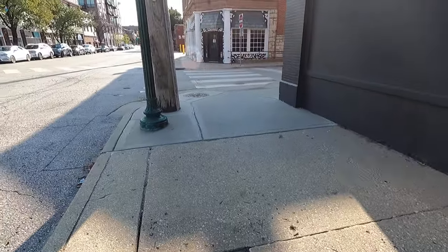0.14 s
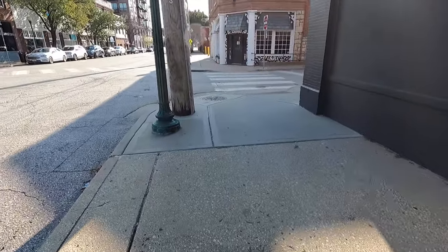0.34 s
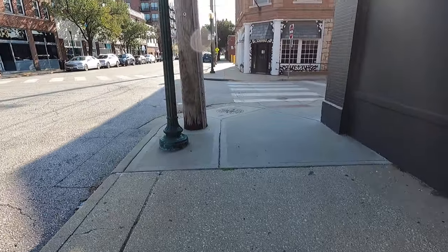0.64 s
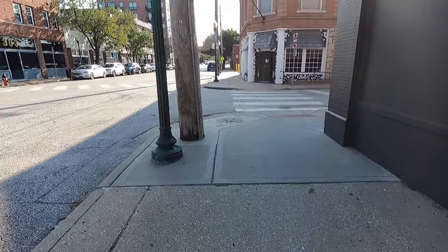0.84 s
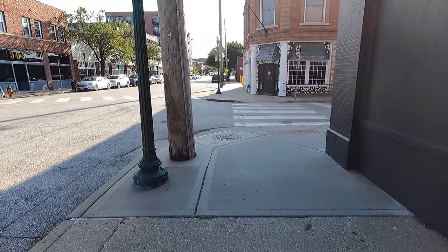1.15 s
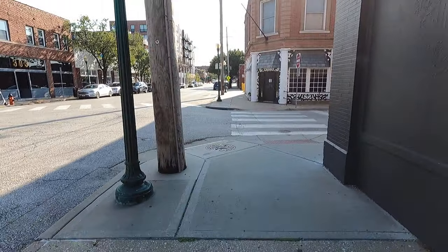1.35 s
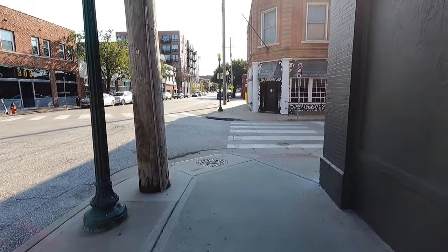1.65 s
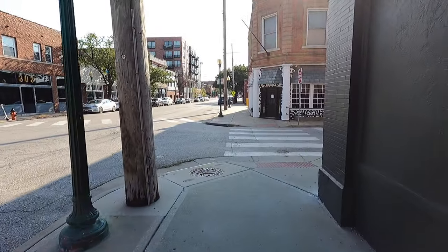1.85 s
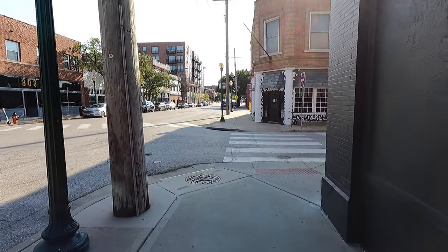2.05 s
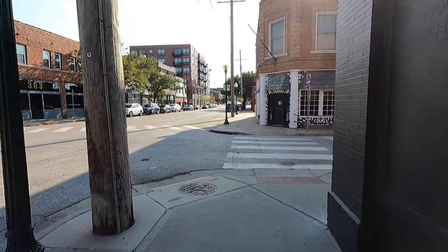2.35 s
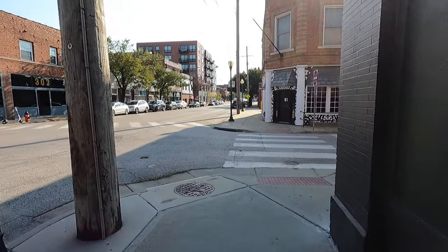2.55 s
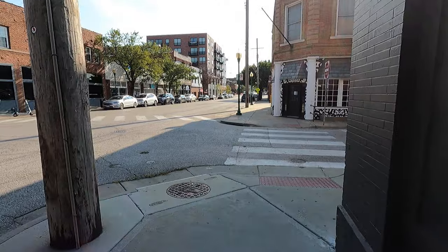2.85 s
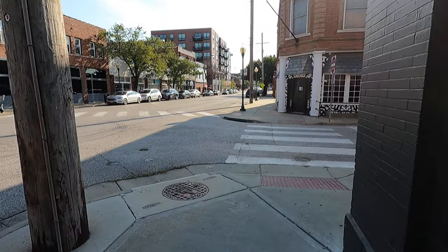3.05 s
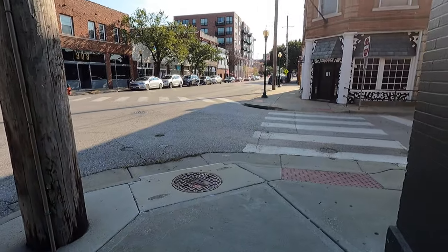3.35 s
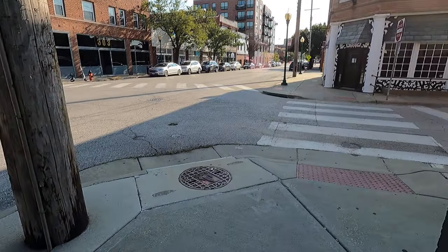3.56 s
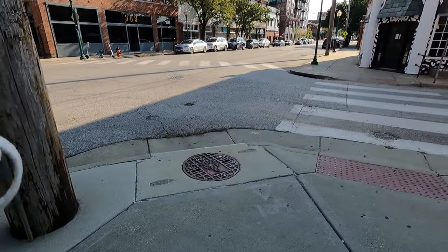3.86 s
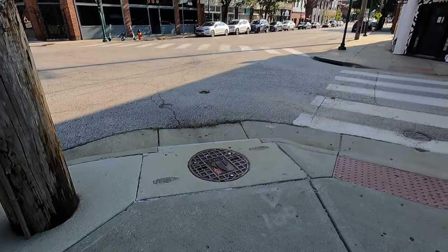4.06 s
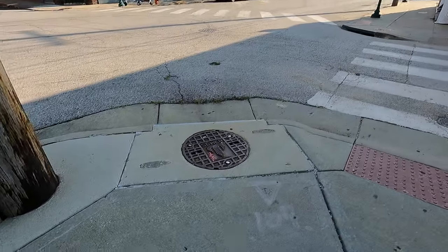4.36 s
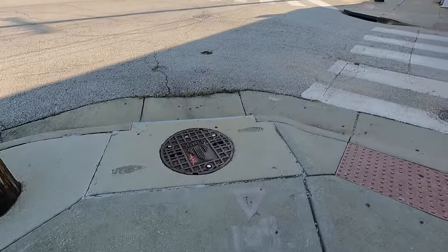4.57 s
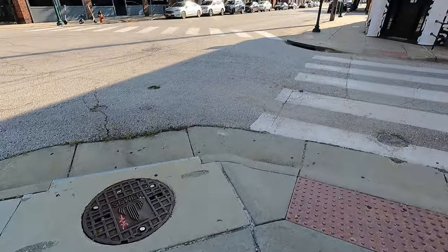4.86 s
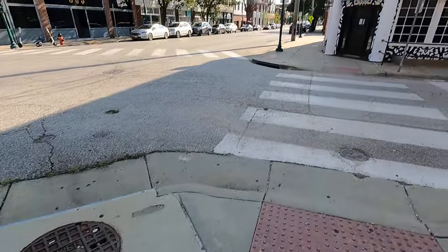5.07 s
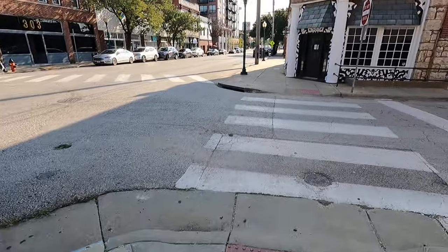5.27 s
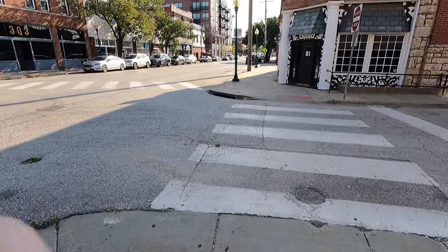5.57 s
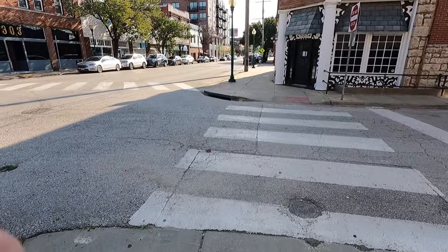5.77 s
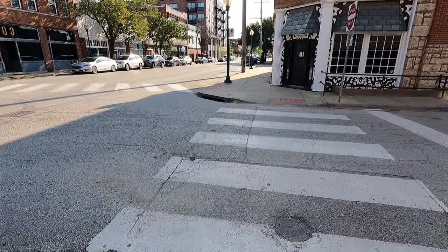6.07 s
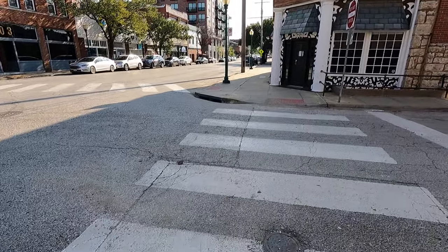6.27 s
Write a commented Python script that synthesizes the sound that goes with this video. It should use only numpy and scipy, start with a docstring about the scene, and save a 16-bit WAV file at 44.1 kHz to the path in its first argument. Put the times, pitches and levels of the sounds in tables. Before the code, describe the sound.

Outdoors on a town pavement, close footsteps tap, crunch and scrape over grit while a large engine rumbles in the street. Its low exhaust swells and ebbs as the pitch sinks, with one short rise in speed. Two brief knocks sound nearby, the first louder. A car's tyres sing and fade away into steady traffic noise, and distant cicadas hiss faintly near the start and end.

```python
"""Small-town pavement, a walk up to a crossing. A big engine with a booming exhaust slows, picks up
briefly and rolls on; its crank orders swell as they slide through the pipe's resonances.
Soles tap and scuff on gritty concrete, echoed by house fronts; two sharp knocks sound close by.
Behind: traffic, the singing tyres of a receding car, cicadas hissing in the trees, a faint whine."""
import sys
import numpy as np
from scipy import signal
from scipy.io import wavfile

SR = 44100
rng = np.random.default_rng(int(sys.argv[2]) if len(sys.argv) > 2 else 0)


def wav_out(sig):
    """Save sig, one row per channel (or a flat mono array), as 16-bit PCM at SR to the path in sys.argv[1]."""
    wavfile.write(sys.argv[1], SR, np.round(np.clip(np.atleast_2d(sig).T, -1, 1) * 32767).astype(np.int16))


N = 282681
TIME_S = np.arange(N) / SR

# crankshaft speed: t/s, f/Hz
CRANK_HZ = [(0.0, 38.5), (0.4, 36.5), (1.0, 35.4), (2.0, 32.7), (2.9, 30.0), (3.45, 28.0), (3.75, 29.9),
            (4.0, 32.4), (4.25, 32.0), (4.5, 29.8), (4.75, 26.3), (5.0, 25.0), (5.25, 24.3), (5.5, 22.5),
            (5.75, 23.4), (6.0, 25.4), (6.2, 25.2), (6.4, 24.3)]
# order drive, ahead of the pipe: t/s, throbbing 2nd/dB, booming 3rd/dB, others/dB
DRIVE_DB = [(0, -18, -4, -8), (.2, 0.5, 2, 5.5), (.5, -18, 2, -6), (.85, -4, -1, -3),
            (1.35, -2, 2.5, -10.5), (1.8, -13.5, -3.5, -3), (2.1, -5, -3, -8.5), (2.5, -6.5, -10.5, 1),
            (2.72, -4, -18, 3.5), (3.05, -8, 4, -7), (3.35, 0, 0.5, -5), (3.75, -8, -0.5, 0),
            (4.05, -4, -8, -3.5), (4.35, -8.5, 4.5, -1), (4.85, -13, -2, -3.5), (5.2, -2.5, -9, -2),
            (5.6, -5, -22, -1.5), (6.05, -4.5, -12, -2.5), (6.41, 0.5, 7.5, -5.5)]
# firing pattern, orders 1-5: gain/dB
FIRING_DB = [-6.5, 2.5, 5.7, 3, 1]
# low pipe resonances: f/Hz, half width/Hz, gain/dB
PIPE_BOOMS = [(31, 6.2, -26.5), (53.3, 7.1, -23.5), (105.4, 9.4, -23.5)]
# upper pipe response: f/Hz, gain/dB
PIPE_UPPER_DB = [(135, -43), (150, -43), (161, -33.5), (174, -40), (190, -40.5), (208, -49.5), (240, -49.5),
                 (268, -49.5), (320, -62.5), (450, -59)]

# soles landing: t/s, tap level/dB, f/Hz, t60/s, crunch level/dB
SOLE_TAPS = [(1.054, -28.5, 1260, .025, -44), (1.085, -21, 1260, 0.0065, -58),
             (1.0978, -23, 1290, 0.0062, -51), (2.653, -31.5, 1320, .03, -37),
             (2.667, -34, 900, 0.023, -49), (2.717, -35, 1210, 0.025, -42),
             (3.331, -29, 1140, 0.038, -46.5), (3.409, -31, 540, 0.014, -63), (3.921, -37, 620, .017, -49),
             (4.515, -41, 1540, 0.022, -50), (4.604, -35.5, 634, 0.022, -55),
             (5.683, -32.5, 1410, 0.057, -40), (5.852, -27, 1400, .014, -60)]
# grit cracking: t/s, level/dB, f/Hz, width/oct
GRIT_CRACKS = [(0.391, -34, 2820, 1.5), (.44, -32, 3500, 1.2), (1.032, -45, 7800, .5),
               (1.05, -33, 4500, 1.6), (1.086, -31, 6500, 0.99), (1.097, -36, 4000, 2),
               (1.154, -49, 7500, 0.4), (1.279, -29, 7200, 0.58), (1.708, -34.5, 4920, 0.61),
               (2.351, -36.5, 2980, 1), (2.653, -35.5, 2400, 1.7), (2.662, -49, 5000, 2),
               (2.85, -33, 3300, 1.2), (4.053, -33.5, 3650, 0.77), (4.4487, -36, 6000, 1.5),
               (4.47, -27, 3850, 1.7), (4.534, -36, 7000, 1.3), (4.786, -38.5, 9700, .8),
               (4.952, -37, 6960, 0.72), (5.237, -40, 7500, 1.3), (5.784, -36, 7450, 1)]
# soles dragging: mid t/s, half length/s, level/dB, f/Hz
SOLE_SCUFFS = [(0.413, 0.08, -51, 2410), (1.081, 0.093, -55, 4000), (1.286, 0.008, -52, 6000),
               (2.662, .011, -55, 4500), (2.72, 0.024, -62, 5000), (5.681, 0.011, -47.5, 1690),
               (4.082, 0.029, -57.5, 3930), (4.413, 0.17, -59, 6070), (4.575, 0.033, -56, 5850),
               (4.676, .043, -59, 6800), (5.132, 0.085, -66, 7550), (5.715, 0.12, -64, 5500),
               (5.894, 0.042, -63.5, 6300), (6.123, 0.022, -60.5, 7400), (6.282, 0.072, -57, 6860)]
# house-front echoes: delay/s, left/dB, right/dB
WALL_ECHOES = [(.009, -9.5, -22.5), (.023, -25.5, -19), (0.061, -16.5, -23.5)]
# knocks: t/s, gain/dB
KNOCK_HITS = [(3.4622, -14), (4.9525, -26)]
# knock modes: f/Hz, level/dB, t60/s
KNOCK_MODES = [(201, 5.5, 0.017), (370, 6.5, 0.0083), (860, 10, 0.0018), (1740, 5, 0.00083),
               (4400, -10, 0.0023), (6300, -11, 0.0023), (11500, -21, 0.0007)]

# traffic rumble, other engines, road roar, cicadas, whine, shimmer: t/s, level/dB
RUMBLE_DB = [(0, -34.5), (.7, -36), (1.6, -37), (2.2, -34), (2.7, -34.5), (3.4, -32.5), (4.7, -32.5),
             (5.2, -30.5), (5.8, -31.5), (6.3, -29.5)]
DRONE_DB = [(0, -27), (.7, -34), (1.6, -34.5), (2.6, -35.5), (3.5, -31), (5, -39.5), (5.7, -36),
            (6.41, -37)]
ROAR_DB = [(0, -41.5), (1.6, -47.5), (2.6, -43), (4, -46), (6.41, -45)]
CICADA_DB = [(0, -59), (1.6, -81), (2.6, -73), (5.6, -57.5), (6.41, -57.5)]
WHINE_DB = [(0, -54), (.8, -76.5), (2.4, -68.5), (3.3, -61.5), (4.2, -66), (6.41, -76.5)]
SHIMMER_DB = [(0, -88.5), (2.2, -91.5), (2.8, -89), (3.3, -82), (3.7, -88), (4.8, -91), (6.41, -93)]
# noise spectra: f/Hz, relative density/dB
RUMBLE_SPECTRUM = [(15, -12), (28, 2.5), (45, 9), (70, 4), (110, -1), (160, -8.5)]
DRONE_SPECTRUM = [(95, 8.5), (160, -3), (200, -2.5), (250, -3), (320, -14.5), (430, -20.5), (520, -35.5),
                  (680, -35)]
ROAR_SPECTRUM = [(230, -8.5), (320, 3), (420, 3.5), (550, -2), (800, -4.5), (1000, -7), (1300, -5),
                 (1700, -9), (2000, -13), (2700, -18), (4500, -17.5), (6300, -26.5), (8000, -48),
                 (10500, -52), (12800, -58)]
TREAD_SPECTRUM = [(400, -5.5), (660, 6), (830, -5), (1000, 0.5), (1250, 0), (1600, -6.5), (2200, -7.5),
                  (3200, -22), (5500, -23), (8000, -30), (12800, -49.5)]
CICADA_SPECTRUM = [(3000, -3.5), (4000, 2.5), (5000, 3), (6700, -5.5)]
# tread singing: t/s, level/dB, f/Hz
TREAD_SONG = [(0, -43, 990), (.4, -44, 1017), (.8, -46.5, 1058), (1.6, -47.5, 998), (2.6, -49.5, 1030),
              (3.2, -52, 1098), (4.5, -56.5, 1004), (6.41, -61.5, 977)]
# left-right likeness: f/Hz, correlation/1
STEREO_CORRELATION = [(30, 0.98), (100, 0.98), (250, 0.99), (500, 0.78), (1000, 0.65), (2000, 0.58),
                      (4000, 0.55), (10000, 0.17)]


def engine(wobble=0.0011, swell=0.12, half_order_db=-27, orders=13):
    """One exhaust pulse per turn, as crank orders; uneven firing roughens them and adds half orders."""
    crank_hz, = in_time(CRANK_HZ)
    second_db, third_db, others_db = in_time(DRIVE_DB)
    crank_rad = 2 * np.pi * np.cumsum(crank_hz * (1 + wobble * drift(4.9))) / SR
    out = 0
    for k in range(1, orders + 1):
        flutter = 0.22 if k > 4 else 0.11 if k > 2 else 0.2
        drive_db = {2: second_db, 3: third_db}.get(k, others_db)
        firing_db = FIRING_DB[k - 1] if k <= len(FIRING_DB) else 0
        smear_rad = rng.uniform(0, 2 * np.pi) if k > 4 else 0  # pipe smears the upper orders
        phase_rad = k * crank_rad + smear_rad
        tone = (1 + swell * drift(3.5)) * np.cos(phase_rad)
        rough = flutter * drift(15) * np.sin(phase_rad)
        half_order = from_db(half_order_db) * drift(3.8) * np.sin(phase_rad + crank_rad / 2)
        out += from_db(drive_db + firing_db) * pipe_gain(k * crank_hz) * (tone + rough + half_order)
    return np.sqrt(2) * out * pan(0.45)


def pipe_gain(hz):
    """Exhaust pipe: low booms and upper resonances, summed in power."""
    boom_power = sum((from_db(db) / (1 + ((hz - centre_hz) / half_width_hz) ** 2)) ** 2
                     for centre_hz, half_width_hz, db in PIPE_BOOMS)
    return np.sqrt(boom_power + from_db(at_hz(PIPE_UPPER_DB, hz)) ** 2)


def footsteps(settle_s=0.01, dust_db=-16, rubber_hz=9500):
    """Soles tap, crunch as they settle, crack grit and drag over dust; rubber dulls the treble."""
    out = np.zeros((2, N))
    lead_s = 0.25  # centre of a rub
    for t_s, db, hz, t60_s, crunch_db in SOLE_TAPS:
        add(out, t_s, from_db(db) * burst(hz, 0.66, t60_s) * pan(1.3))
        crunch = rub(half_length_s=0.01, hz=1130, octaves=1.86)
        add(out, t_s + settle_s - lead_s, from_db(crunch_db) * crunch * pan(0.8))
    for t_s, db, hz, octaves in GRIT_CRACKS:
        add(out, t_s, from_db(db) * crack(hz, octaves) * pan(5))
    for t_s, half_length_s, db, hz in SOLE_SCUFFS:
        scuff = rub(half_length_s, hz, octaves=1.28) * pan(1.5)
        dust = rub(half_length_s, hz=10500, octaves=0.73, grain_db=6.5) * pan(3)
        add(out, t_s - lead_s, from_db(db) * (scuff + from_db(dust_db) * dust))
    return lowpass(out, rubber_hz)


def burst(hz, octaves, t60_s, size=4096):
    """Contact: decaying noise in one band, mono peak 1."""
    decay = from_db(-60 * TIME_S[:size] / t60_s)
    sound = spread(*band(rng.standard_normal((2, size)) * decay, hz, octaves), hz)
    return sound / np.abs(sound.mean(axis=0)).max()


def crack(hz, octaves, crumble_db=-12.5, size=4096):
    """A grain breaks: sharp click, short crumble."""
    click = band(signal.unit_impulse(size), hz, octaves)
    return click / np.abs(click).max() + from_db(crumble_db) * burst(hz, octaves, t60_s=0.01)


def rub(half_length_s, hz, octaves, grain_db=3.5):
    """Rubber over concrete: dense grains swell and fade, centred in 0.5 s."""
    t_s = np.arange(-SR // 4, SR // 4) / SR
    grains = rng.standard_normal((2, len(t_s)))
    grains *= from_db(grain_db * np.minimum(rng.exponential(1, len(t_s)), 6))
    stroke = np.exp(-(t_s / half_length_s) ** 2)
    return stroke * unit_rms(spread(*band(grains, hz, octaves), hz))


def house_fronts(x):
    """Direct sound plus wall echoes."""
    out = x.copy()
    for delay_s, left_db, right_db in WALL_ECHOES:
        add(out, delay_s, x * from_db([[left_db], [right_db]]))
    return out


def knocks():
    """Hard contacts ring heavily damped modes of alternating sign."""
    out, t_s = np.zeros((2, N)), TIME_S[:4096]
    ring = sum((-1) ** k * from_db(db - 60 * t_s / t60_s) * np.sin(2 * np.pi * hz * t_s)
               for k, (hz, db, t60_s) in enumerate(KNOCK_MODES))
    for start_s, db in KNOCK_HITS:
        add(out, start_s, from_db(db) * ring * pan(7.8))
    return out


def traffic():
    """Low rumble, drone of other engines, road roar."""
    rumble = from_db(in_time(RUMBLE_DB)) * street_noise(RUMBLE_SPECTRUM, waver_db=-1.5, waver_hz=5.3)
    drone = from_db(in_time(DRONE_DB)) * street_noise(DRONE_SPECTRUM, waver_db=0.5, waver_hz=17)
    roar = from_db(in_time(ROAR_DB)) * street_noise(ROAR_SPECTRUM, waver_db=1.82, waver_hz=9.8)
    return rumble + drone + roar * pan(0.66)


def tyres(start_db=-43, fade_db_per_s=3):
    """Receding car: tread noise; air pumped through the grooves sings near 1 kHz."""
    fade = from_db(start_db - fade_db_per_s * TIME_S)
    tread = fade * street_noise(TREAD_SPECTRUM, waver_db=3, waver_hz=2.3)
    song_db, song_hz = in_time(TREAD_SONG)
    song = from_db(song_db) * gliding_noise(song_hz, width_hz=183)
    return (tread + song) * pan(1.3)


def cicadas(top_hz=6400, sizzle_db=-7):
    """Far chorus merged into hiss; the shrillest sizzle just under its sharp upper edge."""
    hiss = street_noise(CICADA_SPECTRUM, waver_db=2.4, waver_hz=8.3)
    sizzle = from_db(sizzle_db + 2 * drift(3)) * narrow_noise(hz=6000, octaves=0.13)
    return from_db(in_time(CICADA_DB)) * lowpass(hiss + sizzle, top_hz, order=14) * pan(-1)


def whine():
    """Faint, unsteady tone that comes and goes."""
    return from_db(in_time(WHINE_DB)) * narrow_noise(hz=2251, octaves=0.051) * pan(1.4)


def shimmer(flicker_db=3, flicker_hz=14):
    """Thin, very high band, flickering faintly."""
    flicker = from_db(flicker_db * drift(flicker_hz))
    return from_db(in_time(SHIMMER_DB)) * unit_rms(flicker * narrow_noise(hz=12100, octaves=0.06))


def street_noise(spectrum, waver_db, waver_hz):
    """Stereo noise in independently wavering third octaves, rms 1."""
    out, white = 0, rng.standard_normal((2, 2, N))
    centres_hz = 1000 * 2 ** (np.arange(-17, 12) / 3)
    for k, hz in enumerate(centres_hz):
        offset_db = waver_db * drift(waver_hz)
        if spectrum[0][0] <= hz <= spectrum[-1][0]:
            mid, side = band(white[k % 2], hz, octaves=1 / 3)
            out += from_db(at_hz(spectrum, hz) + offset_db) * spread(mid, side, hz)
    return unit_rms(out)


def narrow_noise(hz, octaves):
    """Stereo noise in one resonance, rms 1."""
    return unit_rms(spread(*band(rng.standard_normal((2, N)), hz, octaves), hz))


def gliding_noise(hz, width_hz):
    """Stereo noise in a moving resonance, rms 1."""
    slow = lowpass(rng.standard_normal((2, 2, N)), width_hz / 2)
    phase_rad = 2 * np.pi * np.cumsum(hz) / SR
    mid, side = slow[0] * np.cos(phase_rad) + slow[1] * np.sin(phase_rad)
    return unit_rms(spread(mid, side, hz.mean()))


def drift(corner_hz, hop=40, warmup=2000):
    """Slow random curve, rms 1."""
    pole = np.exp(-2 * np.pi * corner_hz * hop / SR)
    white = rng.standard_normal(N // hop + warmup + 2)
    slow = signal.lfilter([1], [1, -2 * pole, pole * pole], white)[warmup:]
    return np.interp(np.arange(N) / hop, np.arange(len(slow)), unit_rms(slow))


def spread(mid, side, hz):
    """Mid and side to stereo, more alike in the bass."""
    alike = at_hz(STEREO_CORRELATION, hz)
    return np.sqrt((1 + alike) / 2) * mid + np.sqrt((1 - alike) / 2) * side * [[1], [-1]]


def pan(left_minus_right_db):
    return from_db([[left_minus_right_db / 2], [-left_minus_right_db / 2]])


def band(x, hz, octaves, order=2):
    ratio = 2 ** (octaves / 2)
    edges_hz = np.clip([hz / ratio, hz * ratio], [10, 11], [0.44 * SR, 0.45 * SR])
    return signal.sosfilt(signal.butter(order, edges_hz, "band", fs=SR, output="sos"), x)


def lowpass(x, hz, order=2):
    return signal.sosfilt(signal.butter(order, hz, fs=SR, output="sos"), x)


def in_time(rows):
    """Each value column at every sample."""
    t_s, *columns = np.transpose(rows)
    return [np.interp(TIME_S, t_s, column) for column in columns]


def at_hz(rows, hz):
    """Table lookup on a log-frequency axis."""
    points_hz, values = np.transpose(rows)
    return np.interp(np.log(hz), np.log(points_hz), values)


def add(out, t_s, sound):
    start = max(round(t_s * SR), 0)
    out[:, start:start + sound.shape[-1]] += sound[..., :N - start]


def from_db(db):
    return 10 ** (np.asarray(db) / 20)


def unit_rms(x):
    return x / np.sqrt(np.mean(x ** 2) + 1e-20)


def scene():
    """Engine, traffic and insects in the street; steps and knocks close by."""
    street = engine() + traffic() + tyres() + whine() + cicadas() + shimmer()
    return street + house_fronts(footsteps()) + knocks()


def record(dry, port_hz=12000, port_db=-2, rolloff_hz=17000, cutoff_hz=13800):
    """Microphone: slight port ring, gentle roll-off, steep top cut."""
    port = from_db(port_db) * band(dry, port_hz, octaves=0.08, order=1)
    soft = lowpass(dry + port, rolloff_hz, order=4)
    return lowpass(soft, cutoff_hz, order=16)


dry = scene()
out = record(dry)
wav_out(out)
```